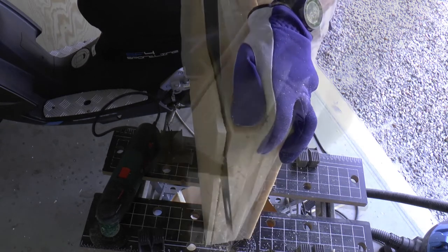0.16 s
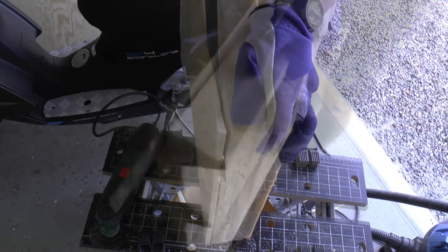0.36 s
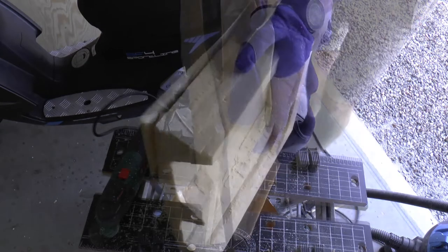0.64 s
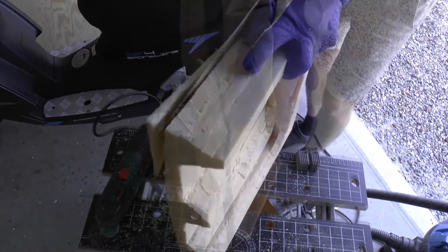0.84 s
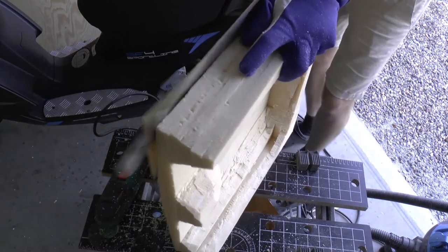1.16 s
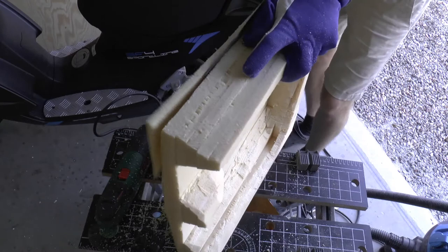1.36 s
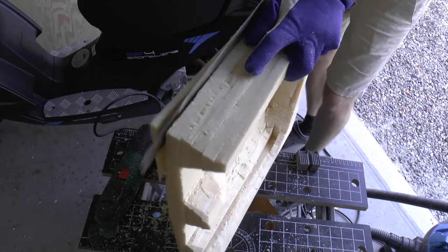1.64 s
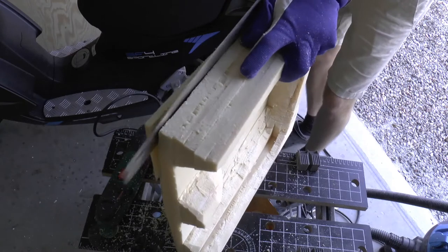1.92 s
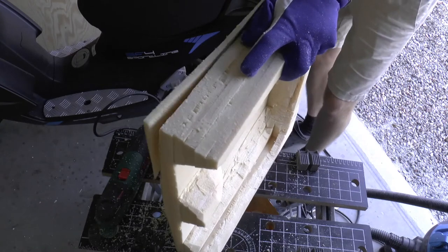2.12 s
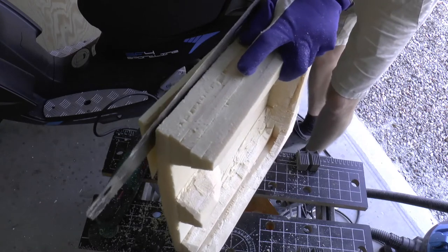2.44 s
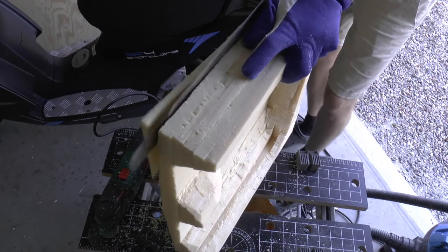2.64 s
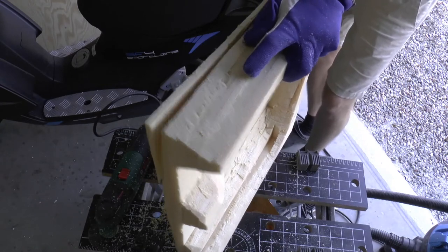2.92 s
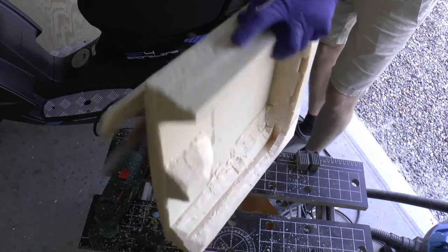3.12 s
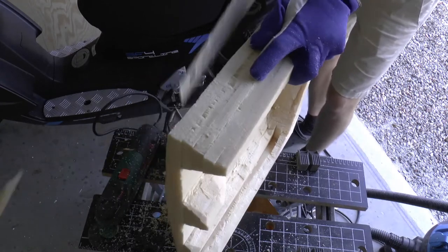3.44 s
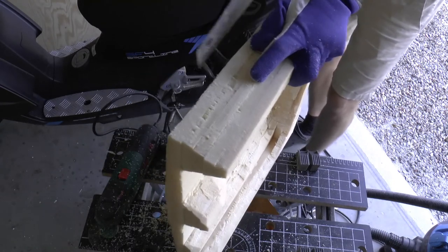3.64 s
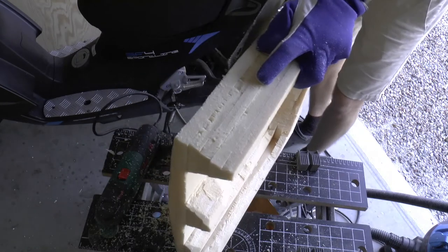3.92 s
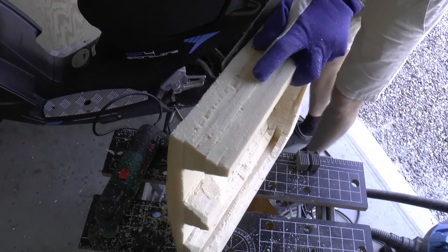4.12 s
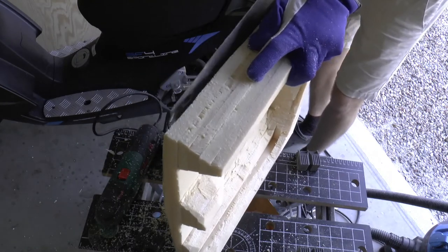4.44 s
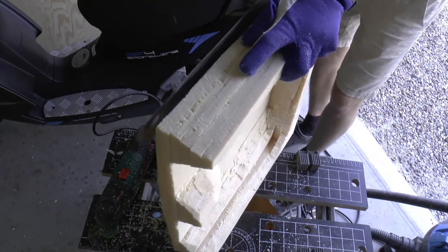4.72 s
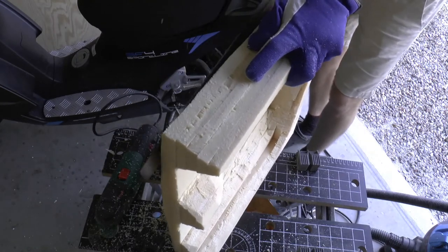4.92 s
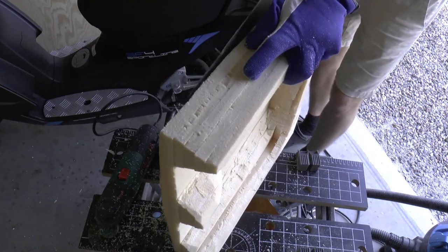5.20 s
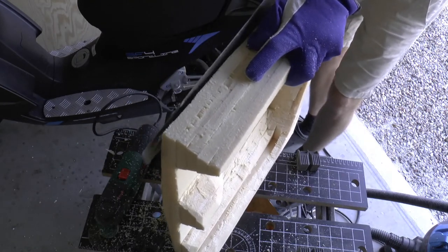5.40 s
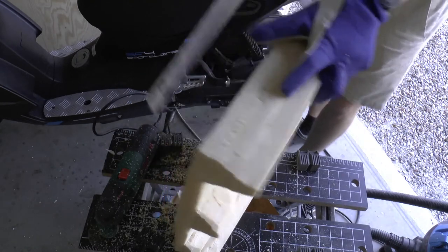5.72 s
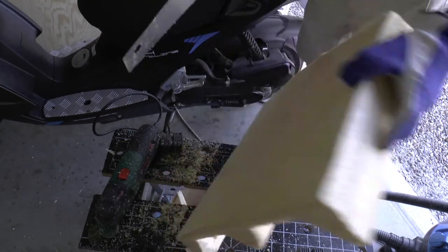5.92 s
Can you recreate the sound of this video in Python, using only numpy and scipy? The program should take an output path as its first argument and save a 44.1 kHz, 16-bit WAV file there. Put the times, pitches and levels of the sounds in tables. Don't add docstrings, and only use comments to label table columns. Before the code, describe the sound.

A close, dry stereo sound in a workshop open to the outside, over a faint airy hush and soft wind rumble. From 0 to 3 seconds a handsaw rasps through foam, about three push and pull strokes a second, alternately strong and weaker. Dense uneven crackles tear the cells; the thin slice buzzes nasally and the block and bench give a hollow low hum. The last stroke, near 2.9, is the strongest. From 3.05 to 3.35 the slice snaps off with a knock, a short hissy slide and clattering taps. At 3.6 the blade tip strikes with a tiny fluttering twang, followed by small dull knocks. Short trimming strokes run from 4.1 to 5.45, strongest around 4.6, with weak nudges, a faint bright wipe near 5.1 and two last scrapes. Then the lifted block shuffles with glove chirps; two thin, high rising squeaks come around 5.8 to 5.9, before faint final rubs at 6.

```python
import sys
import numpy as np
from scipy import signal
from scipy.fft import rfft, irfft, next_fast_len
from scipy.io import wavfile
from scipy.ndimage import uniform_filter1d

SR = 44100
rng = np.random.default_rng(int(sys.argv[2]) if len(sys.argv) > 2 else 0)


def ratio_of_db(decibels):
    return 10 ** (np.asarray(decibels, float) / 20)


def put_to_file(sound):
    columns = np.atleast_2d(sound).T
    safe = np.clip(columns, -1, 1)
    whole_steps = np.round(safe * 32767)
    wavfile.write(sys.argv[1], SR, whole_steps.astype(np.int16))


N = 267378
TIME = np.arange(N) / SR


def level(x, db):
    return x * ratio_of_db(db) / np.sqrt(np.mean(x ** 2))


def colour(x, points, closed=True):
    size = next_fast_len(N)
    hz, db = np.transpose(points)
    f = np.log(np.arange(size // 2 + 1) * SR / size + 1)
    inside = (f >= np.log(hz[0])) & (f <= np.log(hz[-1])) if closed else 1
    gain = ratio_of_db(np.interp(f, np.log(hz), db)) * inside
    return irfft(rfft(x, size) * gain, size)[..., :N]


def ring(x, modes):
    return sum(ratio_of_db(db) * signal.lfilter(*signal.iirpeak(hz, hz / width, SR), x) for hz, width, db in modes)


def walk(rate):
    k = int(SR / rate)
    steps = np.repeat(rng.standard_normal(N // k + 1), k)
    return 1.68 * uniform_filter1d(uniform_filter1d(steps, k), k)[:N]


def decay(t, t60):
    return np.exp(-np.log(1000) * t / t60)


# frequency in Hz, level in dB per Hz.
AIR_TONE = [(90, -17), (130, 5), (260, -2), (371, 0), (486, -12), (720, -15), (950, -38), (1400, -26),
            (1800, 0), (2300, -2.5), (4000, -5), (6660, -16), (10000, -34), (15800, -36)]


def air():
    mid, side = colour(rng.standard_normal((2, N)), AIR_TONE) * ratio_of_db(0.8 * walk(6))
    return level(np.array([mid + 0.25 * side, mid - 0.17 * side]), -58.5)


# time in seconds, level in dB.
WIND_GUSTS = [(0.0, -76), (0.3, -80), (0.8, -70), (1.0, -73), (1.5, -65), (1.8, -73), (2.1, -72),
              (2.23, -62), (2.4, -74), (2.75, -76), (2.93, -59), (3.1, -69), (3.45, -74), (3.6, -67),
              (3.75, -72), (4.45, -74), (4.65, -66), (5.8, -66), (6.06, -66)]
# frequency in Hz, level in dB per Hz.
WIND_TONE = [(8, -4), (30, 1), (65, 5), (110, 11)]


def breeze():
    s, db = np.transpose(WIND_GUSTS)
    gust = ratio_of_db(np.interp(TIME, s, db) + 1.2 * walk(4.7))
    mid, side = level(colour(rng.standard_normal((2, N)), WIND_TONE), 0) * gust
    return np.array([1.6 * mid + 0.16 * side, 1.8 * mid - 0.16 * side])


def room(x, t60=0.11):
    t = TIME[:SR // 2]
    tail = rng.standard_normal((2, len(t))) * decay(t, t60) * (t > .004)
    return signal.fftconvolve(x[None], tail / np.sqrt(np.sum(tail ** 2) / 2), axes=1)[:, :N]


# start in seconds, peak level in dB, swing in Hz, time to fade by 20 dB in
# seconds.
BENCH_JOLTS = [(0.716, -41, 96.5, 0.057), (0.918, -55, 142, 0.085), (1.159, -40, 110, 0.09),
               (1.468, -39, 112, 0.09), (1.898, -48, 110, 0.15), (2.042, -61, 117, 0.09),
               (2.189, -36, 122, 0.061), (2.386, -45, 141, 0.077), (2.55, -56, 106, 0.09),
               (2.904, -53, 113, 0.08), (3.058, -34, 118, 0.1), (3.31, -37, 119, 0.049),
               (3.615, -50, 117, 0.12), (3.866, -49.5, 138, 0.092), (4.228, -47, 120, 0.085),
               (4.607, -41.5, 130, 0.075), (5.311, -41, 134, 0.061), (5.444, -42, 117, 0.039)]


def jolts():
    out, t = np.zeros(N + SR), TIME[:SR // 2]
    for s, db, hz, t60 in BENCH_JOLTS:
        i = int(s * SR)
        swell = 1 - np.exp(-t / 0.0058)
        out[i:i + len(t)] += ratio_of_db(db) * decay(t, t60 * 3) * swell * np.sin(2 * np.pi * hz * t)
    return out[:N]


def turns(hz):
    return 2 * np.pi * np.cumsum(hz) / SR


# start in seconds, letting go in seconds, low tone in dB,
# high tone in dB, lingering level in dB.
SQUEAK_EVENTS = [
    (5.797, 5.835, -38, -50.5, -90),
    (5.838, 5.921, -35.5, -44.5, -52),
]
SUM_TONES = [(2, 0), (1, 1), (0, 2)]
SUM_TONE_DB = [-58, -57, -66]


def squeaks():
    out = 0
    for s, end, low_db, high_db, linger_db in SQUEAK_EVENTS:
        t = np.maximum(TIME - s, 0)
        gone = np.maximum(TIME - end, 0)
        low = turns(3900 - 1300 * np.exp(-t / .009)) + 0.21 * walk(220)
        high = turns(6066 - 2000 * np.exp(-t / .0095)) + 0.48 * walk(150)
        swell = np.exp(-t / .017)
        tired = np.maximum(t - .055, 0)
        release_db = 2500 * gone
        linger = np.where(gone > 0, linger_db - 90 * gone, -200)
        low_db = np.maximum(low_db - 34 * swell - 170 * tired - release_db, linger)
        high_db = np.maximum(high_db - 12 * swell - 560 * tired - release_db, linger - 10)
        low_db = np.where(t > 0, low_db, -200) + 1.2 * walk(120)
        high_db = np.where(t > 0, high_db, -200) + 1.5 * walk(120)
        out = out + np.sqrt(2) * (ratio_of_db(low_db) * np.sin(low) + ratio_of_db(high_db) * np.sin(high))
        for (m, n), db in zip(SUM_TONES, SUM_TONE_DB):
            gain = ratio_of_db(db + 0.38 * (low_db + high_db + 86) + 2.2 * walk(90))
            out = out + gain * np.sin(m * low + n * high + .6 * walk(200)) * (t > 0)
    return out


def rub(rows, width_hz, up_bend, down_bend, peak):
    out = np.zeros(N)
    core = np.clip(130 / width_hz, 0, 1)
    smear = core + (1 - 0.78 * core) * 0.92 * (walk(width_hz) + 1j * walk(width_hz))
    for s, length, from_hz, to_hz, db in rows:
        at = slice(int(s * SR), int((s + length) * SR))
        along = np.clip((TIME[at] - s) / length, 0, 1)
        bend = up_bend if to_hz > from_hz else down_bend
        hz = from_hz + (to_hz - from_hz) * along ** bend
        gain = ratio_of_db(db) * np.sin(np.pi / 2 * np.interp(along, [0, peak, 1], [0, 1, 0])) ** 1.06
        out[at] += gain * np.real(smear[at] * np.exp(1j * turns(hz)))
    return out


# start in seconds, length in seconds, first pitch in Hz, last pitch in Hz, level in dB.
THIN_CHIRPS = [(3.23, .012, 3000, 2750, -44), (5.535, .055, 3130, 3000, -48),
               (5.574, .022, 2750, 3080, -47), (5.588, .026, 2900, 2640, -46),
               (5.668, .05, 2700, 3220, -48), (5.69, .07, 3200, 3100, -52), (5.716, .012, 2600, 3080, -40),
               (5.678, .04, 2000, 2200, -53), (5.698, .028, 2200, 2300, -45),
               (5.72, .014, 2280, 2330, -44), (5.73, .022, 2300, 2350, -47), (5.962, .04, 2250, 2200, -50),
               (5.98, .04, 2230, 2040, -46), (6.015, .04, 2150, 2320, -52), (5.995, .045, 2700, 2600, -55),
               (5.945, .04, 2900, 3100, -58), (5.11, .062, 7150, 7000, -47)]


def chirps():
    return rub(THIN_CHIRPS, width_hz=160, up_bend=.4, down_bend=1.4, peak=.35)


# start in seconds, length in seconds, first pitch in Hz, last pitch in Hz, level in dB.
FOAM_WIPES = [
    (3.105, .02, 4300, 3900, -30),
    (3.116, .035, 3800, 3400, -27),
    (5.088, .03, 11500, 7900, -47),
    (5.095, .05, 14000, 13200, -51),
    (5.1, .045, 11000, 9800, -48),
    (5.108, .025, 7700, 6800, -43),
    (3.742, .03, 8800, 8200, -48),
]


def wipes():
    return rub(FOAM_WIPES, width_hz=1500, up_bend=.4, down_bend=.4, peak=.3)


# start in seconds, length in seconds, first pitch in Hz, last pitch in Hz, level in dB.
BLOCK_HUMS = [(.42, .08, 255, 255, -49), (.75, 0.1, 256, 257, -43), (.88, .1, 256, 258, -44),
              (1.1, .07, 256, 256, -48), (1.17, 0.13, 257, 256, -44), (1.46, .22, 257, 255, -37.5),
              (1.93, 0.094, 346, 345, -46), (2.03, .11, 257, 256, -39.5), (2.18, .08, 256, 256, -46),
              (2.31, 0.16, 257, 256, -37.5), (2.72, .11, 256, 256, -43), (2.94, .07, 348, 345, -43),
              (2.95, .09, 255.5, 259, -36.5), (3.05, 0.064, 256, 256, -36), (3.12, 0.1, 256, 256, -44),
              (3.285, .04, 350, 350, -41), (4.11, 0.09, 258.5, 258, -39.5), (4.2, .1, 257, 257, -46),
              (4.3, .09, 256, 256, -43.5), (4.44, .09, 257, 256, -46), (4.6, .13, 258, 258, -37.5),
              (4.72, 0.093, 256.4, 257, -43), (2.22, .07, 760, 740, -33), (2.29, .05, 740, 740, -36),
              (1.6, .08, 1436, 1436, -44), (2.33, .07, 1436, 1436, -44), (.74, .045, 2290, 2300, -27),
              (.895, .03, 2350, 2250, -30), (5.3, 0.095, 348, 348, -40), (5.3, .1, 256, 256, -44),
              (5.42, 0.11, 256, 258, -49.5)]


def hums():
    return rub(BLOCK_HUMS, width_hz=24.93, up_bend=1, down_bend=1, peak=0.47)


# start in seconds, length in seconds, first pitch in Hz, last pitch in Hz, level in dB.
BLADE_TWANGS = [
    (3.6027, 0.002, 3150, 3250, -14),
    (3.6045, 0.0011, 3300, 3300, -27),
    (3.6054, .0019, 3350, 3200, -14.5),
    (3.6075, .002, 3100, 3100, -25),
    (3.6098, .0022, 3250, 3300, -19),
    (3.616, 0.0064, 3600, 3700, -28),
    (3.626, 0.0072, 3200, 3400, -27),
    (3.637, .005, 3400, 3400, -31),
]


def twangs():
    return rub(BLADE_TWANGS, width_hz=60, up_bend=1, down_bend=1, peak=0.65)


# start in seconds, peak in dB, ring in Hz, ring time (t60) in seconds,
# dull share into the block in dB.
BRIGHT_TAPS = [(3.233, -43, 2930, .02, -20), (3.258, -33, 2600, 0.014, -20), (3.2871, -23, 740, 0.004, -1),
               (3.287, -19, 2200, 0.0027, 2), (3.352, -51, 5900, .15, -30), (3.353, -52, 7100, .12, -30),
               (3.251, -52, 8750, 0.012, -29), (3.743, -57, 5870, .002, -27),
               (3.352, -31.5, 3900, 0.0027, -15), (3.6032, -28, 3900, 0.003, -25),
               (3.6064, -26, 6500, 0.003, -30), (3.336, -32, 2250, .008, -20), (3.864, -48, 1100, .006, 0),
               (3.781, -37, 1500, 0.004, -6), (4.0308, -40, 1900, 0.004, -25),
               (4.0525, -27, 2000, 0.004, -25), (3.1088, -22, 4300, .008, -20),
               (4.986, -38, 2100, 0.011, -16), (4.876, -35, 2260, .012, -20),
               (5.6395, -38, 3600, .002, -15), (5.644, -43, 2800, .003, -15), (5.651, -43, 3000, .002, -15),
               (5.214, -30, 2280, .01, -15), (5.219, -25.5, 2020, .012, -15)]
# start in seconds, peak in dB, ring in Hz, ring time (t60) in seconds,
# dull share into the block in dB.
DULL_KNOCKS = [(3.062, -25.5, 746, 0.022, -12), (3.0625, -32, 320, .04, -5), (3.2876, -32, 450, .014, 0),
               (3.292, -31, 620, .02, -5), (3.300, -31, 480, .04, -5), (3.306, -33, 720, .03, -8),
               (3.675, -52, 220, .12, -10), (3.783, -45.5, 550, 0.056, -10), (4.883, -43.5, 343, 0.081, -5),
               (4.915, -47, 338, 0.11, -2), (3.864, -44, 352, 0.1, 2), (3.870, -42, 620, .012, 6),
               (3.8755, -43, 520, .012, 6), (3.879, -43, 800, 0.012, 4), (3.876, -42, 270, 0.15, 0),
               (3.889, -48, 680, .05, 4), (3.906, -47, 352, 0.07, 0)]


def taps():
    bright, dull, t = np.zeros(N), np.zeros(N), TIME[:SR // 8]
    crack = ratio_of_db(-7) * np.gradient(rng.standard_normal(len(t)) * np.exp(-t / 0.00049))
    for s, db, hz, t60, dull_db in BRIGHT_TAPS + DULL_KNOCKS:
        i = int(s * SR)
        fade = decay(t, t60) * (1 - np.exp(-t / (t60 / 20))) * 2
        bright[i:i + len(t)] += ratio_of_db(db) * (fade * np.sin(2 * np.pi * hz * t) + crack * (hz > 1000))
        dull[i] += ratio_of_db(db + dull_db)
    return bright + ratio_of_db(16.5) * ring(dull, BLOCK_MODES)


# full bite from and until in seconds, tearing in dB,
# drift along the stroke in dB, slice ring against tearing in dB.
CUT_STROKES = [
    (-0.064, 0.229, -33, -0.9, -4.5),
    (0.396, 0.64, -34, -4.5, -1.5),
    (0.746, 0.939, -31, -2, 2.5),
    (1.133, 1.332, -31, -1.7, -1),
    (1.492, 1.711, -28.5, -2.5, 2),
    (1.867, 2.094, -32.5, 0.2, -2),
    (2.216, 2.399, -28, -3, 2),
    (2.566, 2.801, -34.5, 3.5, -2.5),
    (2.913, 3.05, -26.5, -1.7, -1.5),
]
TRIM_STROKES = [(4.09, 4.15, -46.5, 11.5, -3.5), (4.19, 4.275, -30, -3.5, -2), (4.305, 4.335, -31, -3, -1),
                (4.432, 4.517, -40, 4, -1), (4.606, 4.758, -27.5, -6, -0.5),
                (4.814, 4.898, -41, -14.5, -3.5), (4.895, 4.945, -44.5, -8.5, 1.5),
                (4.984, 5.059, -50, -3.5, -5), (5.115, 5.19, -50, 8, -4), (5.234, 5.349, -32, 1.5, -0.5),
                (5.38, 5.458, -34.5, -8.5, 0)]


def stroke_powers(t, seat_db, fine_db):
    power = 0
    cut, trim = (257, 250, -1.5, -2), (378, 313, -0.5, -0.5)
    for rows, (rise, fall, *sag_db) in (CUT_STROKES, cut), (TRIM_STROKES, trim):
        for k, (s, end, db, drift_db, slice_db) in enumerate(rows):
            along = (t - s) / (end - s)
            outside = rise * np.maximum(s - t, 0) + fall * np.maximum(t - end, 0)
            tear = db + drift_db * np.clip(along, 0, 1) - outside
            tear = uniform_filter1d(tear, int(.02 * SR / 64))
            mute = np.clip(500 * (s - t), 0, 5) * (rows is CUT_STROKES and k % 2 == 0)
            thin = tear + slice_db + 3 - mute + sag_db[k % 2] * np.clip(along, -0.29, 1)
            power = power + ratio_of_db([tear, thin, tear + seat_db, tear + fine_db]) ** 2
    return power


# start in seconds, tearing in dB, fade in dB per second,
# slice ring against tearing in dB, block against tearing in dB.
SCUFF_EVENTS = [(.325, -46, 100, -5, -12), (2.5, -49, 100, -7, -6), (3.062, -45, 160, 0, 12),
                (3.108, -35, 200, -2, -9), (3.128, -32.5, 240, 2, -1), (3.25, -42, 300, -5, -13),
                (3.287, -43.5, 200, 8, 7), (3.34, -60, 250, 8, 0), (3.605, -25.5, 210, -5, -25),
                (4.0525, -43, 84, -5, -14), (3.45, -60, 22, 0, -16), (3.62, -50, 150, 0, 3),
                (3.68, -60, 300, 0, 8), (3.741, -46, 300, -12, -23), (3.781, -58, 150, -2, 2),
                (3.812, -56, 130, 1, -12), (3.865, -60, 150, 2, 10), (4.031, -57, 150, 0, -12)]
# the same five columns in seconds, dB and dB per second.
LIFT_SHUFFLES = [
    (5.5, -53, 58, 3.5, -5),
    (5.545, -55.5, 93, 4, -6),
    (5.635, -62, 120, 11, -10),
    (5.692, -54, 200, 0, -6),
    (5.735, -58, 40, 3, -6),
    (5.765, -57, 120, 2, -5),
    (5.79, -57, 37, -5, -10),
    (5.985, -69, 40, 16, 4),
    (6.045, -57.5, 100, 5, 4.5),
]


def scuff_powers(t):
    power = 0
    for rows, fine_db in (SCUFF_EVENTS, -3), (LIFT_SHUFFLES, -7):
        for s, db, fade, slice_db, block_db in rows:
            tear = db - 5000 * np.maximum(s - t, 0) - fade * np.maximum(t - s, 0)
            power = power + ratio_of_db(tear + np.array([[0], [slice_db], [block_db], [fine_db]])) ** 2
    return power


# time in seconds, block against tearing in dB, finest cells against tearing in dB.
CUT_DEPTH = [(0, -13, -5.5), (.42, -6, -4), (.62, -11, -4), (.85, -4.5, -5.5), (1.25, -3, -5),
             (1.6, -4, -4.5), (1.9, -5.5, -5), (2.1, -3.5, -3.5), (2.28, -4, -4.5), (2.45, -4, -3.5),
             (2.75, -5, -5), (2.9, -7.5, -0.5), (3.05, -8, -4), (4.2, -5.5, -5.5), (4.5, -6.5, -6.5),
             (4.65, -8, -5), (4.85, -2.5, -5), (5.05, -12, -1.5), (5.11, -16, 8), (5.18, -7, -5),
             (5.45, -3, -6)]


def bites():
    t = TIME[::64]
    at, block_db, crumb_db = np.transpose(CUT_DEPTH)
    resting = ratio_of_db(-68 + np.array([[0], [4], [-4], [-5]]) + 0 * t) ** 2
    strokes = stroke_powers(t, np.interp(t, at, block_db), np.interp(t, at, crumb_db))
    power = resting + strokes + scuff_powers(t)
    return [np.interp(TIME, t, 10 * np.log10(p)) for p in power]


def cracks(share, spread_db, bite_db):
    size_db = spread_db * np.minimum(rng.exponential(size=N), 3)
    return rng.standard_normal(N) * ratio_of_db(size_db + bite_db) * (rng.random(N) < share)


# pitch in Hz, width in Hz, level in dB.
BLOCK_MODES = [(256, 16, 0), (344, 36, 0), (406, 39, -2.5), (525, 70, -9.5), (610, 77, 0), (736, 110, 1.5),
               (934, 49, -8), (1075, 39, -3.5), (1222, 40, -5.5), (1434, 40, -1)]
# pitch in Hz, width in Hz, level in dB.
BENCH_MODES = [(59, 57, -23), (117, 12.5, -3), (162, 37, -9.5)]
# time in seconds, upper against lower in dB.
GRIP_TILT = [(.15, 3), (.5, 0), (.85, -6.5), (1.2, -4), (1.6, -7.5), (2.0, -3), (2.3, -10.5), (2.7, 3),
             (3.0, -13), (3.3, 11.5), (3.9, 2), (4.2, -2), (4.45, 11), (4.7, -17), (4.9, 8), (5.3, 10),
             (5.6, -9)]


def block_on_bench(bite):
    push = cracks(.3, 0.62, 0.16 * bite + 1.57 * walk(40))
    grip_db = np.interp(TIME, *np.transpose(GRIP_TILT)) / 2
    block = ring(push * ratio_of_db(-grip_db), BLOCK_MODES[:1]) + ring(push * ratio_of_db(grip_db), BLOCK_MODES[1:3])
    for mode in BLOCK_MODES[3:]:
        block += ring(push * ratio_of_db(1.56 * walk(3.75)), [mode])
    return level(block, 0) + level(ring(push, BENCH_MODES), -17.5)


# frequency in Hz, level in dB per Hz.
TEAR_TONE = [(2600, -10.5), (3400, -0.5), (4400, -2), (5700, -1.5), (7000, -3), (8200, -10), (9500, -90)]
# frequency in Hz, level in dB per Hz.
FINE_TONE = [(6500, -23), (7800, -5.5), (9000, 1), (10500, 0.5), (12000, -5), (14000, -7), (15500, -15.5),
             (17000, -27)]
# pitch in Hz, width in Hz, level in dB.
SLICE_MODES = [(1885, 230, -2.5), (2052, 280, 2.5), (2195, 110, 3), (2303, 84, 6.5), (2503, 67, 0),
               (2410, 86, 3), (2616, 140, -0.5), (2804, 380, -1), (3130, 350, -31)]


def saw():
    tear_db, slice_db, block_db, fine_db = bites()
    bite = 0.28 * walk(270) + 0.43 * walk(30.15)
    cells = cracks(.4, 1.5, bite)
    tear = level(colour(cells, TEAR_TONE), 0) * ratio_of_db(tear_db)
    fine = level(colour(cells, FINE_TONE), 0) * ratio_of_db(fine_db)
    flutter = cracks(.3, 0.83, bite + 0.49 * walk(90))
    thin = level(ring(flutter, SLICE_MODES), 0) * ratio_of_db(slice_db)
    return tear + fine + thin + block_on_bench(bite) * ratio_of_db(block_db)


# frequency in Hz, side against middle in dB.
ROOM_WIDTH = [(30, -12), (60, -20), (130, -10), (300, -6), (700, -10.5), (1290, -12), (2380, -16),
              (4400, -14), (6500, -27.5), (8800, -8.5), (11000, -48), (13000, -25), (15000, -14)]
# frequency in Hz, left against right in dB.
BASS_LEAN = [(30, -2), (110, -2), (250, -3), (420, -2), (700, -.5), (2500, -.1)]


def scene():
    near = saw() + taps() + jolts() + wipes() + chirps() + hums() + twangs() + squeaks()
    wet = room(near)
    mid = near + ratio_of_db(-13) * wet[0]
    side = ratio_of_db(-3.5) * colour(wet[1], ROOM_WIDTH, closed=False)
    hz, db = np.transpose(BASS_LEAN)
    left = colour(mid, np.transpose([hz, db / 2]), closed=False)
    right = colour(mid, np.transpose([hz, -db / 2]), closed=False)
    return np.array([left + side, right - side]) + air() + breeze()


def low_pass(x):
    return signal.sosfilt(signal.butter(12, 15840, fs=SR, output="sos"), x)


# frequency in Hz, width in Hz.
CASE_HOLES = [(1560, 86)]


def record(dry):
    for hz, width in CASE_HOLES:
        dry = 0.19 * dry + 0.69 * signal.lfilter(*signal.iirnotch(hz, hz / width, SR), dry)
    mix = signal.sosfilt(signal.ellip(10, .3, 70, 15800, fs=SR, output="sos"), dry)
    return low_pass(mix)


dry = scene()
out = record(dry)
put_to_file(out)
```